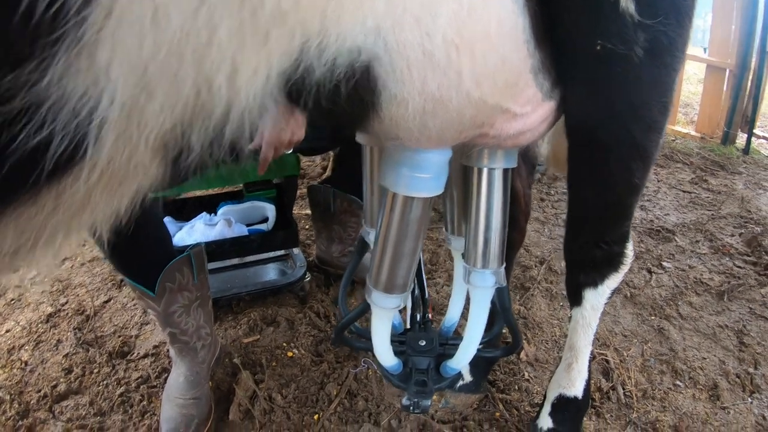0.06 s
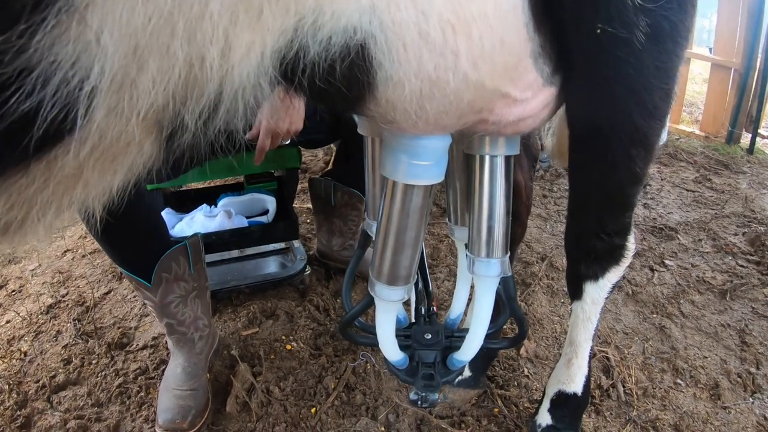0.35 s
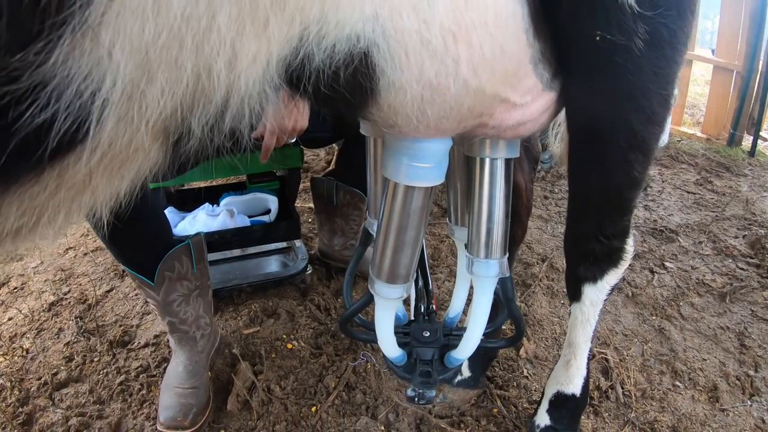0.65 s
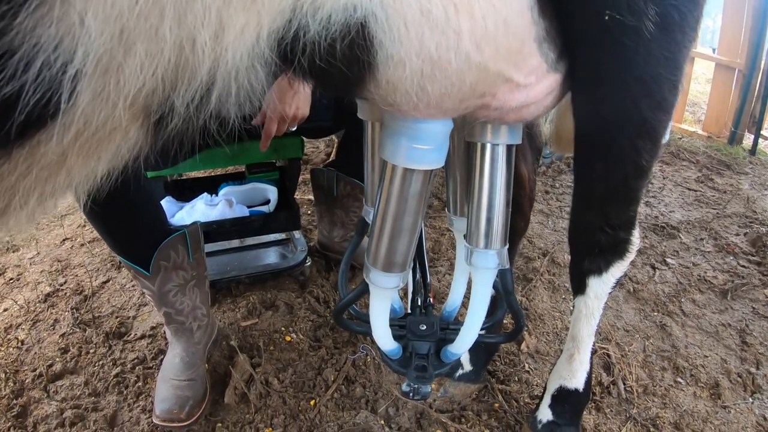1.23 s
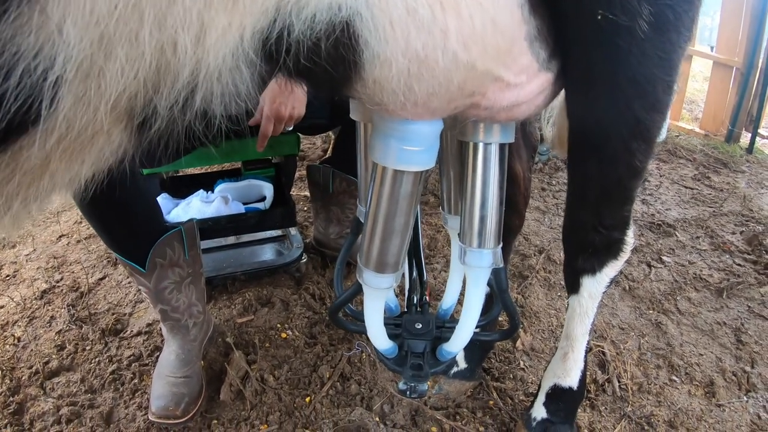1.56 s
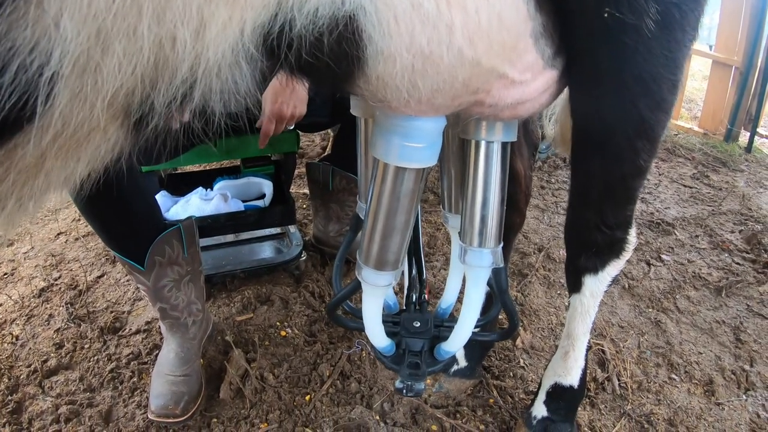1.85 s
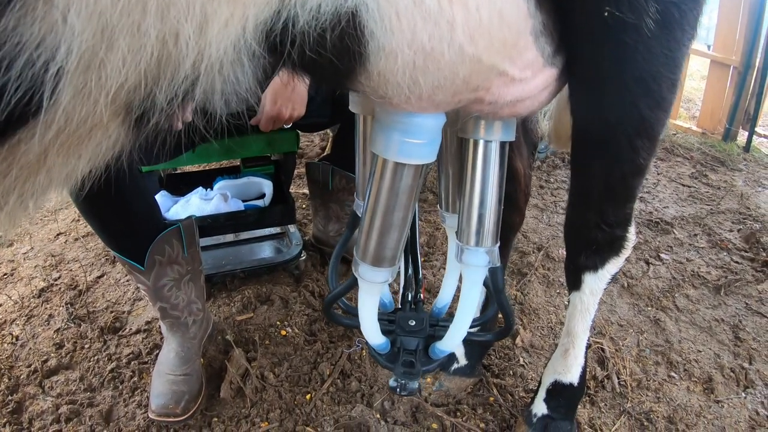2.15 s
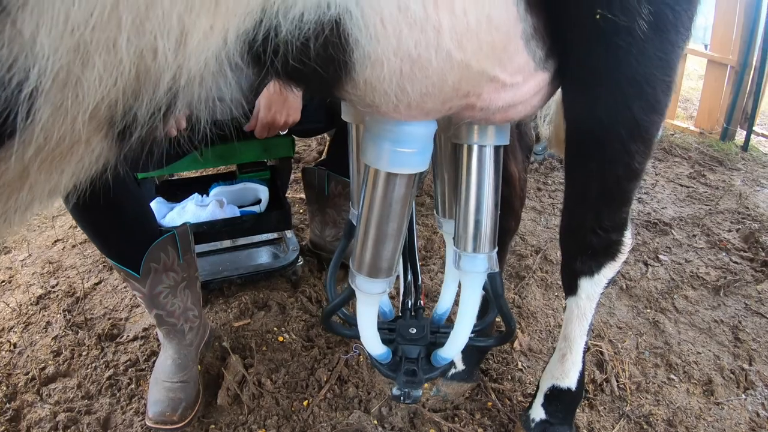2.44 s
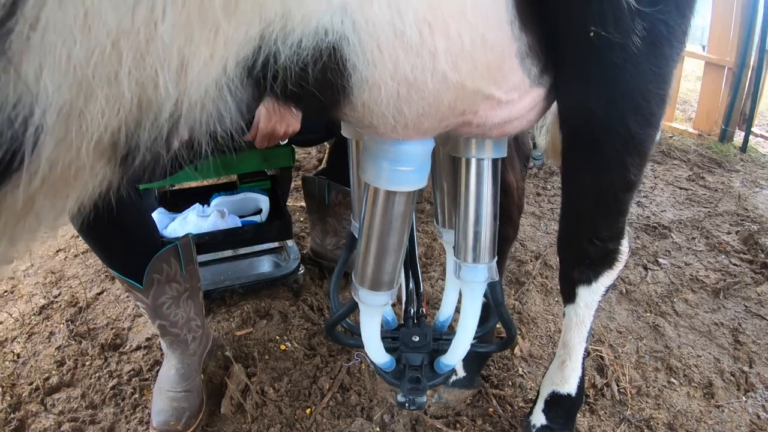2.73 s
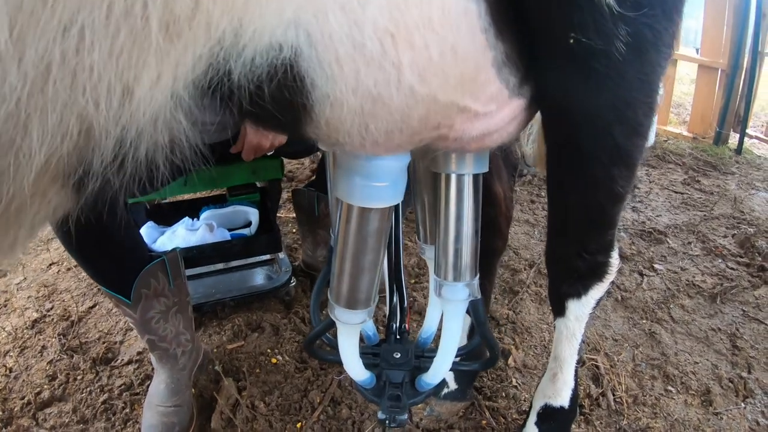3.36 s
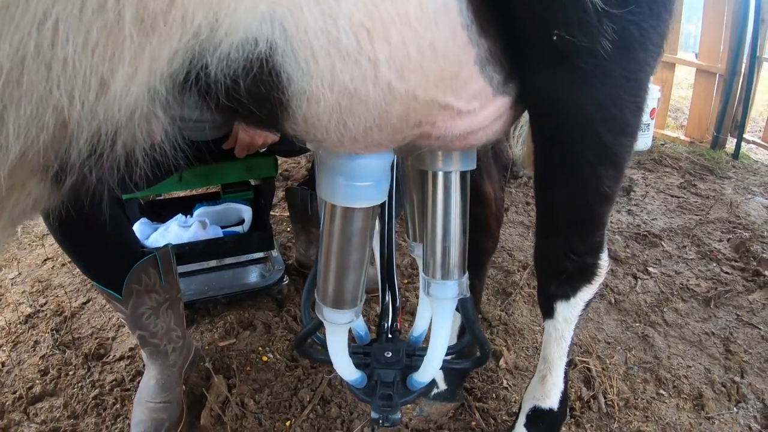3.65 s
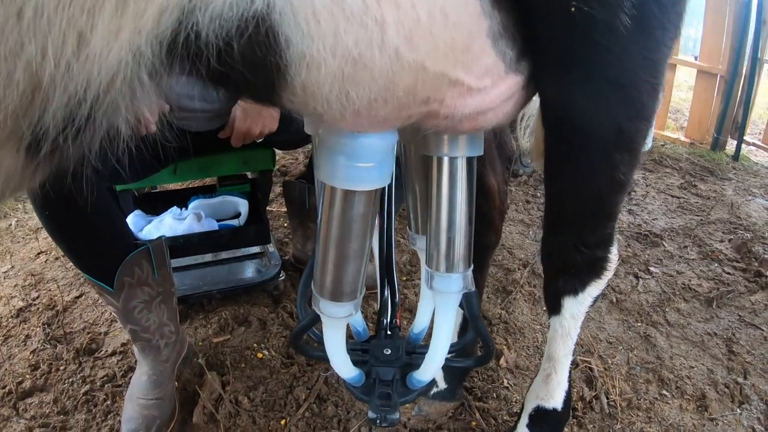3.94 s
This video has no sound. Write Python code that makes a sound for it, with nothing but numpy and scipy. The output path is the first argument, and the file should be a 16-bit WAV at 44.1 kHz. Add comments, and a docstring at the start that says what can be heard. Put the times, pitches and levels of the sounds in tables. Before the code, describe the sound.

A milking machine's vacuum pump drones for the whole four seconds in an outdoor pen, a throbbing hum with a whine, fast rattle and thin squeak over rushing air. From about 0.4 seconds its valve gives a faint short hiss roughly every half second. Light wind brushes the microphone, with soft handling bumps around 2.7 and 3.6 seconds. The squeak eases after 3 seconds, and a high hiss briefly swells.

```python
"""A steady, beating drone with a whine, a rattle and a squeak over rushing air: the vacuum pump of a
milking machine in an outdoor pen. Four vanes puff a harmonic series that beats against the motor's hum;
the rotor whines and whistles, and its rattle and chirp recur once a turn. Airflow rings the metal parts.
A little wind and handling rumble reach the microphone, the pulsator valve admits two alternating short
hisses per cycle, and a high hiss surges now and then."""
import sys
import numpy as np
from scipy import signal
from scipy.fft import rfft, irfft
from scipy.io import wavfile

SR = 44100
rng = np.random.default_rng(int(sys.argv[2]) if len(sys.argv) > 2 else 0)


def bounce(signal):
    """Save signal as a 16-bit WAV file at the path given by the first command-line argument."""
    frames = np.transpose(np.atleast_2d(signal))
    limited = np.clip(frames, -1, 1)
    pcm = np.round(limited * 32767).astype(np.int16)
    wavfile.write(sys.argv[1], SR, pcm)


N = 176400

SHAFT_HZ, VANES = 28.065, 4
WANDER_TURNS, JITTER_TURNS = 0.0029, 0.0001  # slow and fast unsteadiness of the shaft
MAINS_HUM_HZ, BEAT_PEAK_S = 120.0, 0.079
SQUEAK_ORDER, CHIRP_ORDER, SQUEAK_FIRST_S = 93, 94.25, 0.029

# An order is a multiple of the shaft rate; balance is left level minus right level.
# Pump harmonics: order, relative level/dB, balance/dB, left phase lead/rad
PUMP_HARMONICS = [(4, -32, 0, -0.0), (8, -55, -1, 0.0), (11, -50, 0, 0.0), (12, -33, 0, 0.1),
                  (16, -38, 1, -0.0), (20, -38.8, 3, -0.4), (24, -44.7, 0, 0.1), (28, -53, -7, -0.8),
                  (32, -45, -1, 2.5), (35, -49, -15, 2.7), (36, -47, -12, -0.9), (37, -49, -4, 1.6),
                  (40, -49, -4, -0.3), (43, -46, -13, -3.0), (44, -36, 5, 0.4), (45, -42, -4, 3.0),
                  (47, -48, 9, 2.5), (48, -45, -8, -0.4), (49, -40, 1, -0.7), (56, -52, 3, 1.4),
                  (74, -48, 2, 0.1)]
# Gains as the microphone shifts: t/s, third vane harmonic/dB, whine/dB, steady squeak/dB, chirp/dB
SHIFT_GAINS = [(0, .6, -.4, 0, -.5), (.35, .6, -.7, 0, .5), (.75, .6, -2.4, 0, 1), (1.35, 1, .9, 0, .5),
               (1.85, .8, -1.4, -1, -1), (2.3, .7, .6, 1, 0), (2.7, -.3, 1.2, 1, 0),
               (3, -2.3, -.9, -.5, -8), (3.45, -1.3, .7, 0, -6), (4, -2.9, .7, -5, -9)]
# High whistles: order, relative level/dB, change per unit shift/dB, balance/dB, left phase lead/rad
SHAFT_WHISTLES = [(181, -47, 1, -8, -1.5), (184, -42, -8, 0, -0.6), (189, -54, 6, -2, -0.1),
                  (192, -41.5, -6, 1, 0.2), (195, -47, -5, -3, 0.3), (197, -53, 4, 1, -1.5),
                  (207, -49, -6, 3, 0.6), (215, -49, -2, -2, -0.9), (224, -49, -3, -4, -1.3),
                  (232, -50, 5, -2, -2.9), (248, -52, 8, -2, -2.4), (250, -44, -1, -11, -2.9),
                  (256, -46, 0, -3, -1.8), (272, -43, -5, -5, -0.5), (276, -50, 4, 1, -2.4)]
# Displacement of the microphone: t/s, relative shift
MICROPHONE_SHIFT = [(0, 0.16), (2.6, 0), (3.1, 1), (3.8, 1.5)]
# Spectral envelope of the rattle: f/Hz, relative level per line/dB
RATTLE_SPECTRUM = [(200, -70), (400, -63), (700, -81), (900, -60), (1100, -54), (1300, -60), (1450, -69),
                   (1900, -51), (2300, -63), (2650, -52.5), (3000, -69), (4850, -86), (5150, -56),
                   (5700, -57), (6200, -71), (6800, -58.5), (7150, -66), (7800, -51), (8700, -70),
                   (10200, -68), (11200, -90)]
# Spectral density of the rushing air: f/Hz, relative mid level/dB, relative side level/dB
AIR_SPECTRUM = [(20, -83, -84), (90, -69.5, -97), (161, -72.5, -97), (250, -71.5, -93), (306, -67.5, -92),
                (510, -70.5, -81), (740, -72, -78), (1100, -67, -66.5), (2080, -69.5, -74.5),
                (2365, -70, -69), (2600, -64, -71), (3155, -69, -72.5), (3620, -71, -80),
                (4740, -71.5, -75), (5100, -70.5, -72.5), (6860, -68.5, -68), (7460, -68.5, -66),
                (7930, -73.5, -71), (10370, -75.5, -75), (11670, -91.5, -87), (12000, -82.5, -83.5),
                (13830, -88.5, -87.5), (14200, -113, -121)]
# Resonances of the metal parts: f/Hz, bandwidth/Hz, level/dB
METAL_MODES = [(3340, 62, -47), (5185, 34, -42.5), (7080, 86, -37), (8400, 10, -48.5), (10320, 14, -50)]
# Direction of the rattle, air and ringing: f/Hz, balance/dB
NOISE_BALANCE = [(700, -2.5), (1500, -1.2), (7400, -1.6), (9200, 1.5), (10000, 0)]
# Spectral density of the wind: f/Hz, relative level/dB
WIND_SPECTRUM = [(10, -22), (26, -1.5), (50, 0), (90, -8.5), (160, -19), (400, -39), (1500, -90)]
# Gusts on the microphone: t/s, half-length/s, level/dB
WIND_GUSTS = [(.92, 0.063, -41), (1.107, 0.076, -36), (1.346, 0.047, -47), (2.396, 0.079, -36),
              (2.71, 0.078, -34), (3.03, 0.044, -45), (3.588, 0.063, -34)]
# Soft bumps on the microphone: t/s, level/dB, f/Hz
HANDLING_BUMPS = [(.065, -34, 213), (2.601, -26, 168), (2.675, -25, 90), (2.714, -33, 190),
                  (2.757, -32, 75), (2.795, -29, 155), (3.562, -25, 99), (3.617, -33, 65)]
# Openings of the pulsator valve: t/s, level/dB
VALVE_OPENINGS = [(.39, -30.5), (.944, -28.5), (1.495, -33), (2.045, -31), (2.59, -32), (3.146, -27),
                  (3.685, -33)]
# Spectral density of the valve's hiss: f/Hz, relative level/dB
VALVE_SPECTRUM = [(900, -1), (2000, 12), (2500, 8), (3600, 10), (4400, 10.5), (5500, 3), (6300, 4),
                  (8300, -3), (11000, -14), (14000, -35)]
# Surges of high hiss: t/s, half-length/s, level/dB, centre f/Hz
HISS_SURGES = [(1.78, 0.051, -42, 7400), (3.39, .025, -35, 5100), (3.522, 0.02, -34, 5100),
               (3.79, .1, -38, 7100)]


def from_db(db):
    """Amplitude ratio: tenfold for every 20 dB."""
    return 10 ** (np.asarray(db) / 20)


def seconds():
    """Uniform sampling: the time of each sample."""
    return np.arange(N) / SR


def rms_one(x):
    """Normalisation to unit mean power."""
    return x / np.sqrt(np.mean(x ** 2) + 1e-20)


def pan(balance_db):
    """Constant-power panning: left and right gains for a level difference."""
    return rms_one(from_db(np.array([[balance_db], [-balance_db]]) / 2))


def stereo(mid, side):
    """Sum and difference of mid and side give left and right."""
    return np.array([mid + side, mid - side])


def in_time(rows):
    """Linear interpolation of each column over time."""
    times, *columns = np.transpose(rows)
    return [np.interp(seconds(), times, column) for column in columns]


def at_hz(points, hz, column=1):
    """Interpolation of a spectrum over log frequency."""
    points = np.array(points)
    return np.interp(np.log(hz + 1e-6), np.log(points[:, 0]), points[:, column])


def pulse(centre_s, half_s):
    """Gaussian envelope, down to 1/e at half_s from its centre."""
    return np.exp(-((seconds() - centre_s) / half_s) ** 2)


def drift(rate_hz):
    """Low-passed noise: a slow random motion of unit variance."""
    step, settle = 40, 2000
    pole = np.exp(-2 * np.pi * step * rate_hz / SR)
    white = rng.standard_normal(N // step + settle + 2)
    slow = signal.lfilter([1], [1, -2 * pole, pole * pole], white)[settle:]
    return np.interp(np.arange(N) / step, np.arange(len(slow)), rms_one(slow - slow.mean()))


def noise(spectrum, column=1):
    """Spectral shaping of white noise to a given power density."""
    gain = from_db(at_hz(spectrum, np.arange(N // 2 + 1) * SR / N, column))
    return irfft(rfft(rng.standard_normal(N)) * gain, N) * np.sqrt(SR / 2)


def partial(phase, level_db, balance_db, lead_rad):
    """A sinusoid, localised by differences of level and phase."""
    phases = phase + np.array([[lead_rad], [-lead_rad]]) / 2
    return np.sqrt(2) * from_db(level_db) * pan(balance_db) * np.cos(phases)


def pump_tones(turns, third_db, whine_db, whine_from_hz=750):
    """Periodic puffs form a harmonic series: the vanes' drone below, the rotor's swaying whine above."""
    out = np.zeros((2, N))
    for order, db, balance_db, lead_rad in PUMP_HARMONICS:
        if order * SHAFT_HZ > whine_from_hz:
            gain_db = 0.75 + whine_db + 0.9 * drift(0.31)
            smear_rad = 6.56
        else:
            gain_db = -0.03 + third_db * (order == 3 * VANES) + 0.18 * drift(2.3)
            smear_rad = 2.6
        # Dispersion: hoses and housing delay the higher harmonics of each puff.
        phase = 2 * np.pi * order * turns - smear_rad * (order / VANES - 1) ** 2
        out -= partial(phase, db + gain_db, balance_db, lead_rad)
    return out


def whistles(turns, gain_db=-1, sway_db=2.5, waver_rad=0.42):
    """High shaft harmonics waver by phase modulation, and fade or swell as the microphone shifts."""
    out = np.zeros((2, N))
    shift, = in_time(MICROPHONE_SHIFT)
    for order, db, change_db, balance_db, lead_rad in SHAFT_WHISTLES:
        level_db = gain_db + db + change_db * shift + sway_db * drift(2.3)
        phase = 2 * np.pi * (order * turns + rng.random()) + waver_rad * drift(6)
        out += partial(phase, level_db, balance_db, lead_rad)
    return out


def motor_hum(hum_db=-42, slot_hz=1115.2, slot_db=-45):
    """Beats: hum at twice the mains rate and a magnetic whine each interfere with a nearby vane tone."""
    t = seconds() - BEAT_PEAK_S
    hum = -from_db(hum_db) * np.cos(2 * np.pi * MAINS_HUM_HZ * t)
    whine = from_db(slot_db) * pan(2) * np.cos(2 * np.pi * slot_hz * t)
    return np.sqrt(2) * (hum + whine)


def squeak(turns, tone_gain_db, chirp_gain_db, sharpness=1.74, scatter_db=1.2, slip_rad=0.08):
    """Friction sustains a steady pitch and, once a turn, a slightly higher chirp of varying strength."""
    cycle = turns + (BEAT_PEAK_S - SQUEAK_FIRST_S) * SHAFT_HZ
    angle = 2 * np.pi * (cycle - np.round(cycle))
    tone = np.sqrt(2) * np.sin(SQUEAK_ORDER * angle + 1.53)
    turn_index = np.round(cycle - np.floor(cycle[0])).astype(int)
    strength, slip = rng.standard_normal((turn_index[-1] + 1, 2))[turn_index].T
    swell = np.exp(sharpness * (np.cos(angle) - 1)) * from_db(scatter_db * strength)
    chirp = rms_one(swell * np.sin(CHIRP_ORDER * angle + slip_rad * slip))
    return from_db(tone_gain_db - 38) * pan(2) * tone + from_db(chirp_gain_db - 37.5) * pan(-2) * chirp


def rattle(turns, gain_db=-2.5, uneven_db=1.5, change=0.36, change_hz=2.3, width=0.31):
    """Repetition gives a line spectrum: the vanes scrape over the same roughness on every turn."""
    size = 8192  # points per turn
    gains = from_db(gain_db + at_hz(RATTLE_SPECTRUM, np.arange(size // 16) * SHAFT_HZ))
    tone_orders = [int(row[0]) for row in (*PUMP_HARMONICS, *SHAFT_WHISTLES)]
    gains[:VANES] = 0
    gains[tone_orders + [SQUEAK_ORDER, round(CHIRP_ORDER)]] = 0  # the rattle lies between the main tones

    def pattern():
        """A Fourier series with random phases, repeating once a turn."""
        heights = np.sqrt(2) * gains * from_db(uneven_db * rng.standard_normal(len(gains)))
        lines = heights * np.exp(2j * np.pi * rng.random(len(gains)))
        return np.interp(turns % 1 * size, np.arange(size), irfft(lines, size) * size / 2)

    def changing_pattern():
        """Superposition with drifting weights slowly alters the pattern."""
        return pattern() + change * sum(pattern() * drift(change_hz) for _ in range(2))

    side = signal.sosfilt(signal.butter(2, 800, "high", fs=SR, output="sos"), changing_pattern())
    power = (1 + 2 * change ** 2) * (1 + width ** 2)
    return stereo(changing_pattern(), width * side) / np.sqrt(power)


def rushing_air(turns, body_below_hz=5000, gain_db=0.18, flutter_db=1.16):
    """Modulated flow noise: its body throbs with every vane, its hiss swells with the motor's beat."""
    rush = stereo(noise(AIR_SPECTRUM), noise(AIR_SPECTRUM, column=2))
    body = signal.sosfiltfilt(signal.butter(2, body_below_hz, fs=SR, output="sos"), rush)
    throb = 1 + 0.11 * np.cos(2 * np.pi * VANES * turns)
    beat = 1 + 0.026 * np.cos(2 * np.pi * (MAINS_HUM_HZ / SHAFT_HZ - VANES) * turns)
    hiss = (rush - body) * beat * from_db(flutter_db * drift(15))
    return from_db(gain_db) * (body * throb + hiss)


def metal_rings():
    """Resonance: broadband airflow keeps a few damped modes of the metal parts ringing."""
    out = np.zeros((2, N))
    for hz, width_hz, db in METAL_MODES:
        radius = np.exp(-np.pi * width_hz / SR)
        feedback = [1, -2 * radius * np.cos(2 * np.pi * hz / SR), radius * radius]
        ring = signal.lfilter([1, 0, -1], feedback, rng.standard_normal((2, N)))
        out += from_db(db) * rms_one(ring)
    return out


def pan_by_frequency(x):
    """A level difference that varies with frequency leans each band to its own side."""
    balance_db = at_hz(NOISE_BALANCE, np.arange(N // 2 + 1) * SR / N)
    return irfft(rfft(x) * from_db(np.array([balance_db, -balance_db]) / 2), N)


def wind(breeze_db=-52):
    """Turbulent pressure rumbles independently in each microphone port and swells in light gusts."""
    gusts = sum(from_db(db) * pulse(at_s, half_s) for at_s, half_s, db in WIND_GUSTS)
    rumble = rms_one(np.array([noise(WIND_SPECTRUM), noise(WIND_SPECTRUM)]))
    return (from_db(breeze_db) + gusts) * pan(8) * rumble


def handling_bumps(half_s=0.0076):
    """Structure-borne sound: each soft bump on the microphone is a brief, low wave packet."""
    t = seconds()
    return pan(2) * sum(from_db(db) * pulse(at_s, half_s) * np.sin(2 * np.pi * hz * (t - at_s))
                        for at_s, db, hz in HANDLING_BUMPS)


def pulsator(attack_s=0.014, decay_s=0.017):
    """Jet noise: each switch of the valve admits a brief hiss; strong and weak ones alternate."""
    envelope = 0
    for at_s, db in VALVE_OPENINGS:
        age = seconds() - at_s
        envelope += from_db(db) * np.exp(-np.where(age < 0, (age / attack_s) ** 2, age / decay_s))
    return envelope * rms_one(stereo(noise(VALVE_SPECTRUM), 0.28 * noise(VALVE_SPECTRUM)))


def high_hiss(width_hz=230):
    """Narrow-band noise surges now and then under Gaussian envelopes."""
    out = np.zeros((2, N))
    for at_s, half_s, db, hz in HISS_SURGES:
        band = signal.butter(2, [hz - width_hz / 2, hz + width_hz / 2], "band", fs=SR, output="sos")
        hiss = rms_one(signal.sosfilt(band, rng.standard_normal((2, N))))
        out += from_db(db) * pulse(at_s, half_s) * hiss
    return out


def scene():
    """Superposition: one shaft times the pump's sounds, while the pulsator keeps its own time."""
    turns = SHAFT_HZ * (seconds() - BEAT_PEAK_S) + WANDER_TURNS * drift(0.53) + JITTER_TURNS * drift(23)
    third_db, whine_db, squeak_db, chirp_db = in_time(SHIFT_GAINS)
    tones = pump_tones(turns, third_db, whine_db) + whistles(turns) + motor_hum()
    tones += squeak(turns, squeak_db, chirp_db)
    pump_noise = pan_by_frequency(rattle(turns) + rushing_air(turns) + metal_rings())
    return tones + pump_noise + wind() + handling_bumps() + pulsator() + high_hiss()


def record(dry, low_hz=18, high_hz=13900):
    """Band limiting removes the deepest bass and the highest treble."""
    x = signal.sosfilt(signal.butter(2, low_hz, "high", fs=SR, output="sos"), dry)
    return signal.sosfilt(signal.ellip(10, .1, 80, high_hz, fs=SR, output="sos"), x)


dry = scene()
out = record(dry)
bounce(out)
```